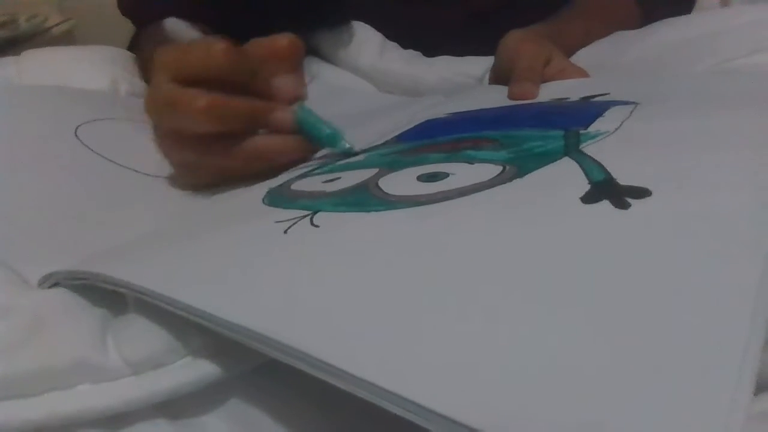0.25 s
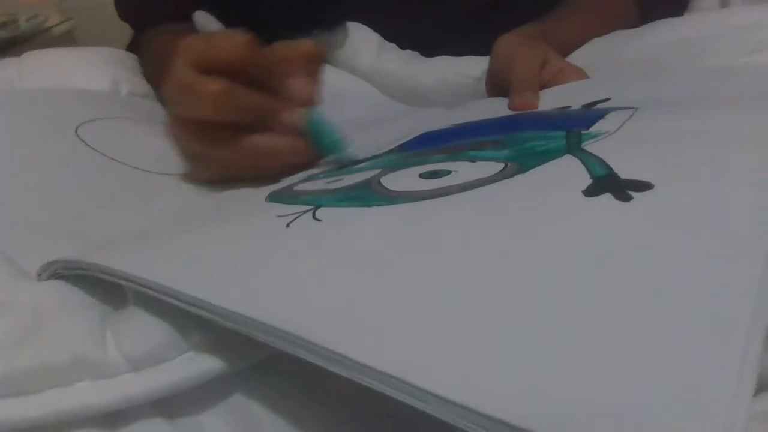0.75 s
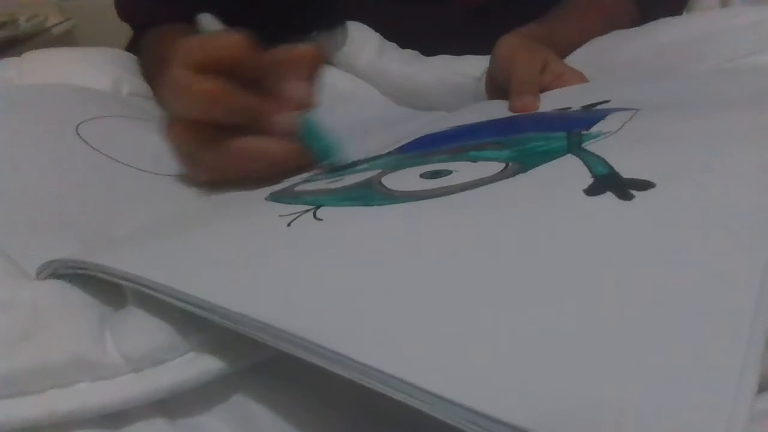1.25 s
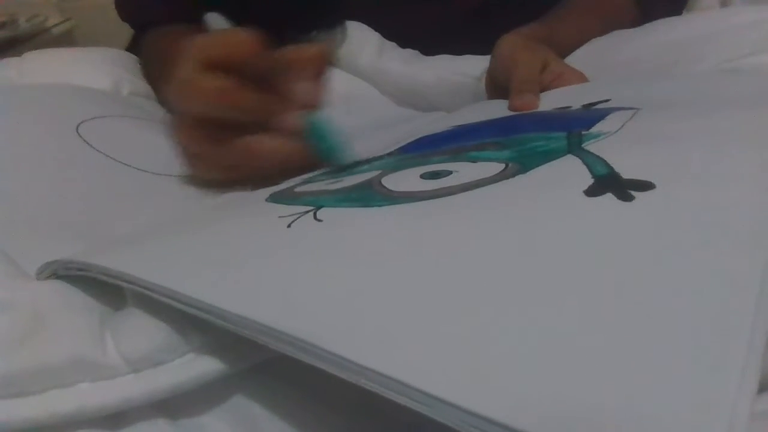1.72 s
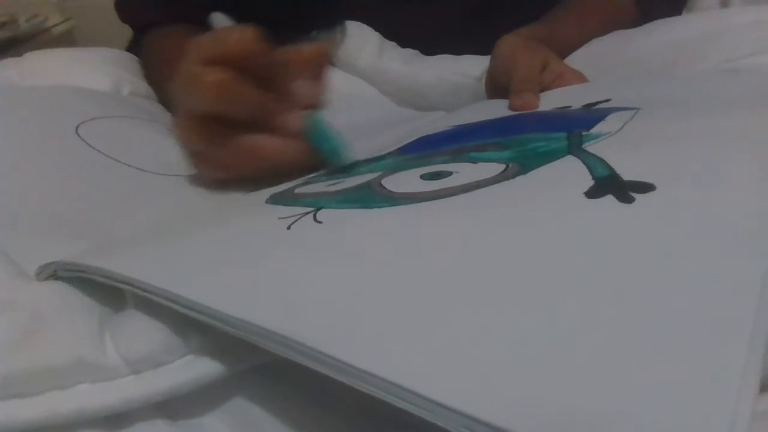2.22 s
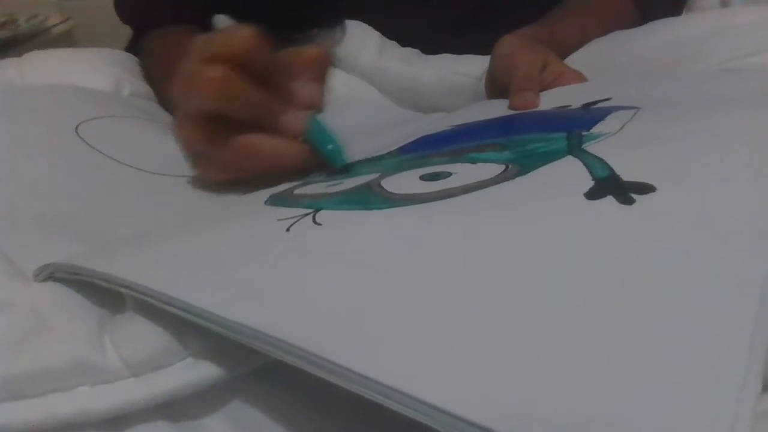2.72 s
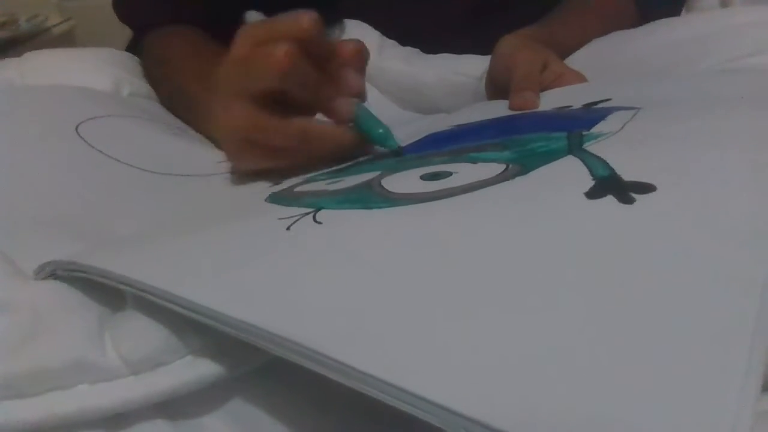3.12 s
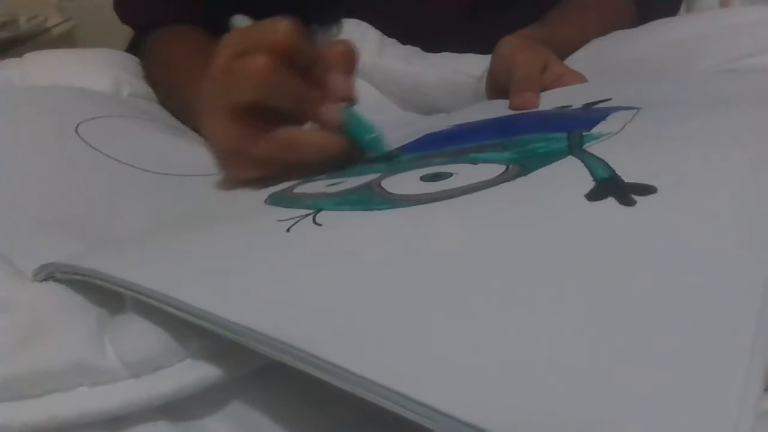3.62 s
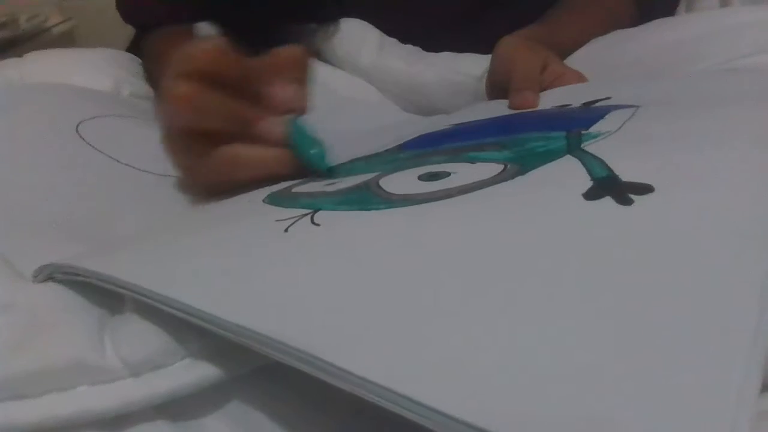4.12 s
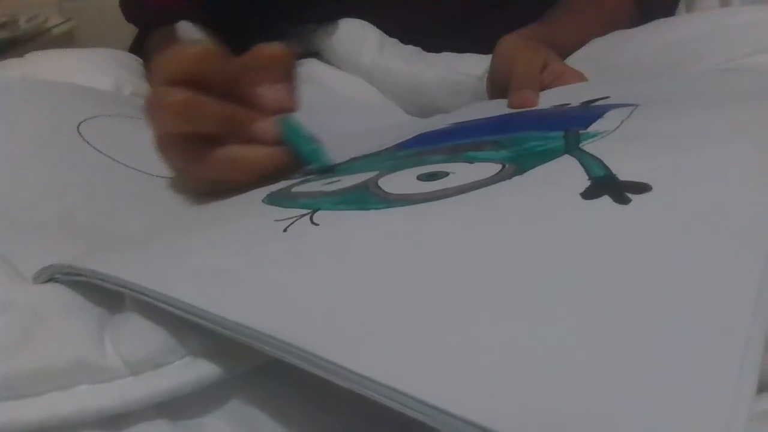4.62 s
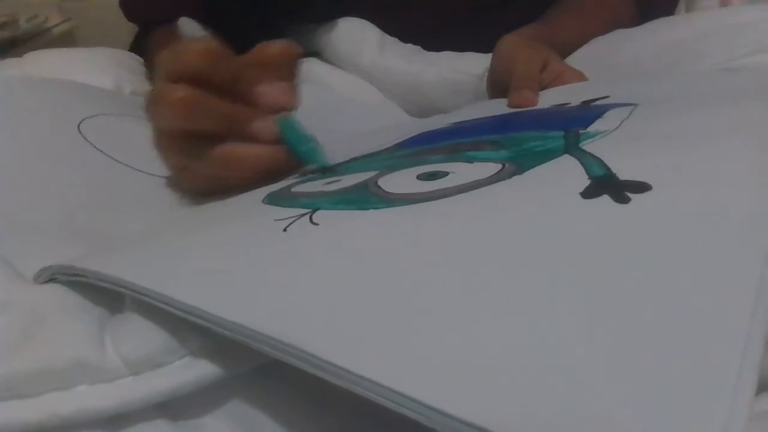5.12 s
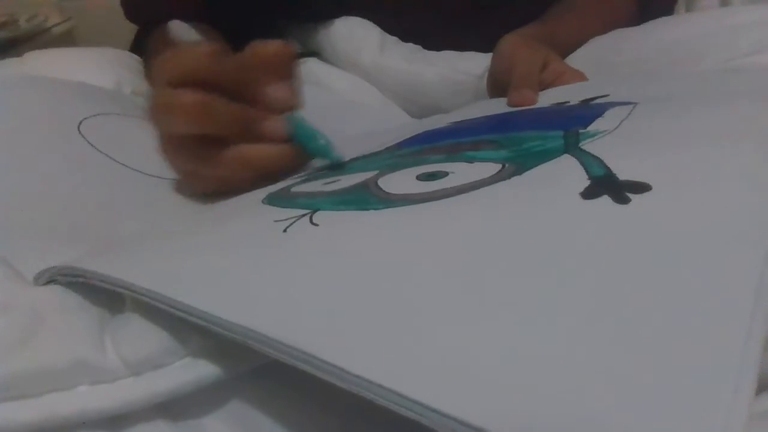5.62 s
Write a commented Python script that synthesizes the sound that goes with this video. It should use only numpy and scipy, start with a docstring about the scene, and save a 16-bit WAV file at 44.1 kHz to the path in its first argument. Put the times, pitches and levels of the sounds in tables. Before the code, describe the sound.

Fast, even marker strokes hiss and squeak softly on paper in a quiet room, with brief knocks first and a hand slide last.

```python
"""A soft hissing, squeaky rub goes back and forth: a felt-tip marker colours a sketchbook page in a quiet room.
Random snaps of felt fibre on paper grain ring the nib and the sheet; the barrel ticks where a stroke turns.
Early on the book knocks a few times, from short decaying rings; at the end the hand slides off the page.
Beneath lie page rustle, rumble from the leaning hand, soft pitched swells and room tone made of shaped noise."""
import sys
import numpy as np
from scipy import signal
from scipy.io import wavfile
from scipy.ndimage import uniform_filter1d

SR = 44100
rng = np.random.default_rng(int(sys.argv[2]) if len(sys.argv) > 2 else 0)


def int16_out(signal):
    """Quantize to a 16-bit WAV file."""
    q = np.round(np.clip(np.atleast_2d(signal).T, -1, 1) * 32767)
    wavfile.write(sys.argv[1], SR, q.astype(np.int16))


N = 258117  # length of the sound in samples

# Colour of the room tone. Each row: pitch in Hz, relative level in dB.
AIR_COLOUR = [(60, -15.5), (120, -3), (250, -4), (500, -6), (800, -14), (1400, -15), (1850, -21),
              (2500, -25), (4200, -15), (6000, -9.5), (9000, -17), (12000, -14.5), (16000, -27)]
AIR_DB = -60.5
HUM_HZ, HUM_DB, HUM_WAVER_DB = 831, -79.5, 1.5

# How fast the room echo fades. Each row: pitch in Hz, time to fall 60 dB in seconds.
ROOM_FADE = [(300, 0.27), (1500, 0.29), (5000, 0.2), (9000, 0.33), (15000, 0.4)]
ROOM_DB = -10

# The hand slides off the page. Each row: time in seconds, level in dB.
SLIDE_LEVEL = [(5.74, -93), (5.765, -47), (5.79, -53), (5.8, -42.5), (5.82, -44.5), (5.83, -47.5),
               (5.86, -42)]
# Rings of the sliding skin. Each row: pitch in Hz, width in Hz, relative level in dB.
PALM_RINGS = [(1090, 72, 4), (1440, 300, 3), (2200, 420, 3.5), (4520, 750, 1.5), (5340, 360, -4)]
# Pages shifting. Each row: time in seconds, level in dB.
RUSTLE_LEVEL = [(0.0, -53.5), (0.314, -49.5), (0.738, -57), (0.9, -64)]
# Rings of the pages. Each row: pitch in Hz, width in Hz, relative level in dB.
PAGE_RINGS = [(350, 410, 0.5), (563, 210, -2), (930, 390, -3.5), (1360, 490, 0)]
# The hand leans on the book. Each row: time in seconds, level of the low ring in dB,
# level of the mid ring in dB (the upper ring follows it, UPPER_DB away).
RUMBLE_LEVEL = [(0, -75, -64), (.44, -62, -60.5), (.9, -68.5, -67), (1.5, -72, -68), (2.5, -68, -64.5),
                (3.0, -71, -66.5), (3.6, -63.5, -64.5), (4.6, -67.5, -69), (5.3, -64.5, -73),
                (5.85, -62, -68)]
# Low, mid and upper ring of the leaned-on book, one list for each.
# Each row in a list: pitch in Hz, width in Hz, relative level in dB.
LEAN_RINGS = [
    [(102, 37, 0)],
    [(154, 88, 1.5), (205.6, 72, 4)],
    [(330.6, 28, 3.5), (498.4, 104, 2)],
]
UPPER_DB, LUMPS_DB, LUMPS_S = -5, 2.5, .08  # each ring comes in slow lumps

# Brief soft pitched swells. Each row: start in seconds, length in seconds, pitch in Hz, width in Hz, level in dB.
SWELLS = [(0.387, 0.066, 2700, 180, -43.5), (0.649, 0.038, 2700, 200, -50), (1.91, 0.082, 495, 54, -59),
          (2.39, 0.088, 157, 45, -55), (2.871, 0.055, 231, 23.15, -59), (2.99, 0.053, 205, 27.78, -56)]

# The book knocks. Each row: time in seconds, level in dB, pitch the blow favours in Hz,
# board thump in dB against that level.
KNOCKS = [(0.0574, -15.5, 1440, -35), (0.0594, -16.5, 980, -7.5), (.0680, -31, 1400, -17),
          (0.0736, -29, 1300, -19), (0.2291, -25, 1520, -5), (0.2342, -25.5, 1090, 1.5),
          (0.3172, -24.5, 900, -3.5), (0.3198, -13.5, 1480, -19), (0.321, -20, 2260, -1),
          (0.329, -34, 1100, -13), (0.438, -26.5, 2200, -4.5), (0.4407, -21, 3200, -8.5),
          (.4420, -23.5, 3340, -1)]
# Rings of the pages under a blow. Each row: pitch in Hz, relative level in dB, time to fall 60 dB in seconds.
BOOK_RINGS = [(770, 3.5, 0.01), (1100, -1.5, 0.012), (1356, 2, 0.011), (1563, 2, 0.0085),
              (2070, -6, 0.0072), (2610, 3.5, 0.0074), (3860, 6.5, 0.0056), (4740, 7, 0.0067)]
BOARD_HZ, BOARD_T60_S = 528, 0.02  # thump of the board

# Barrel ticks where the nib grips or stops. Each row: time in seconds, level in dB, pitch in Hz.
TICKS = [(0.5907, -45.5, 1570), (0.7198, -49, 1370), (0.7921, -44, 1310), (0.9104, -48, 1300),
         (0.959, -44.5, 1490), (1.0364, -47.5, 1360), (1.2804, -47, 1420), (1.4377, -49.5, 1450),
         (1.6338, -48, 1316), (1.678, -45.5, 1450), (1.989, -46.5, 1390), (2.116, -47.5, 1310),
         (2.607, -43.5, 1320), (2.6515, -48, 1480), (2.8907, -43.5, 1440), (2.9623, -45, 1360),
         (3.4387, -48.5, 1510), (4.7497, -50, 1430)]
# Fainter ticks as every stroke sets off and stops. Each holds: level in dB against the rub, middle pitch in Hz.
GRIP_TICK = (-17.5, 1462)
STOP_TICK = (-17, 1343)
TICK_SPREAD_DB = 2.5

# Strokes, out and back in turn. Each row: start in seconds, length in seconds,
# rub level in dB as it sets off, rub level in dB as it arrives.
STROKES = [(0, 0.081, -39, -35), (.11, 0.089, -35.5, -42.5), (.243, 0.081, -39, -34),
           (.353, 0.097, -34.5, -41.5), (0.476, 0.089, -37.5, -36), (0.587, 0.085, -36, -39),
           (0.718, 0.08, -40, -34), (0.839, 0.082, -35, -39.5), (0.959, 0.083, -39, -33.5),
           (1.071, 0.087, -34.5, -38), (1.204, .079, -36, -32), (1.31, 0.09, -38, -40.5),
           (1.437, 0.077, -39.5, -35), (1.547, 0.093, -39.5, -39.5), (1.675, 0.083, -39.5, -37.5),
           (1.782, 0.093, -37.5, -38.5), (1.914, 0.084, -37, -37.5), (2.029, 0.091, -38.5, -41),
           (2.156, 0.082, -38, -36.5), (2.278, 0.086, -37, -37), (2.401, .077, -36, -36),
           (2.522, 0.092, -36, -40), (2.649, 0.076, -36, -33), (2.762, .085, -33.5, -37.5),
           (2.888, 0.078, -37.5, -31.5), (3.006, 0.087, -35.5, -38.5), (3.127, 0.081, -42, -36),
           (3.245, 0.089, -37, -41.5), (3.366, .077, -42.5, -38), (3.478, 0.094, -39, -44.5),
           (3.612, 0.076, -39.5, -41.5), (3.721, 0.078, -37, -40.5), (3.842, 0.063, -41, -43.5),
           (3.937, 0.084, -37.5, -43.5), (4.049, 0.082, -40.5, -44.5), (4.146, 0.1, -44, -44.5),
           (4.269, 0.081, -44, -44), (4.371, .093, -45, -41.5), (4.502, 0.075, -40.5, -45),
           (4.599, 0.072, -42.5, -42.5), (4.707, 0.06, -41.5, -43), (4.786, 0.073, -45.5, -44.5),
           (4.89, 0.08, -44.5, -42), (4.995, 0.084, -42.5, -42.5), (5.11, 0.077, -44, -42.5),
           (5.21, 0.074, -48, -39.5), (5.323, 0.07, -41.5, -42.5), (5.412, 0.076, -45.5, -40.5),
           (5.519, 0.064, -41.5, -45), (5.597, 0.072, -42, -47), (5.688, 0.068, -41.5, -43.5)]
# The grip drifts. Each row: time in seconds, hiss centre in Hz, nib squeak in Hz, crispness 0-1,
# mid-stroke easing 0-1, then levels in dB against the hiss of the breathy skirt under the squeak,
# the shoulder, the low sheet ring and the high sheet ring. Speed and direction shift these further.
GRIP = [(0, 9200, 6200, 0.76, 0.97, -5.5, -3.5, -5, -9.5),
        (.4, 8980, 6220, 0.77, 0.6, -4.5, -3, -12.5, -11.5),
        (.9, 8750, 6270, 0.91, 0.88, -5.5, -6.5, -15, -15),
        (1.6, 8940, 6220, .95, 0.65, -7, -1.5, -16, -13),
        (2.2, 9010, 6230, 0.8, .9, -4.5, -4.5, -14.5, -13.5),
        (2.9, 9200, 6210, 0.6, 1, -5, -12, -18.5, -13), (3.3, 9260, 6180, 0.37, 0.16, -6, -9.5, -15, -13),
        (3.75, 9180, 6070, 0, 0, -6, -12, -14, -11), (4.2, 9150, 6120, 0.43, 0.43, -5, -4, -12, -12.5),
        (4.8, 8850, 6120, 0.42, .2, -3.5, -1, -10.5, -17.5),
        (5.3, 8850, 6250, 0.56, .2, -2.5, 0.5, -10.5, -16), (5.8, 8800, 6240, 0.7, 0, -5, -3, -7.5, -21)]

# Rings that slide with the hiss centre. Each row: Hz from the centre, width in Hz, relative level in dB.
HISS = [(-400, 920, -3), (-15, 1700, 0), (595, 820, -6)]
EDGE = [(1660, 1460, 0)]
TOP = [(3200, 1400, -2), (4400, 900, -11)]
# Rings that slide with the squeak pitch. Each row: Hz from that pitch, width in Hz, relative level in dB.
SQUEAK = [(66, 530, 0.5)]
SKIRT = [(-850, 900, 0.33), (-350, 450, -0.23)]
# Rings that stay put. Each row: pitch in Hz, width in Hz, relative level in dB.
SHOULDER = [(7200, 450, 0), (7750, 500, -1)]
FIZZ_LOW = [(14170, 750, 0)]
FIZZ = [(15100, 1000, -1), (14800, 430, -5.5)]
SHEET_LOW = [(2324, 330, -3.5), (2740, 760, 0.9)]
SHEET_HIGH = [(3680, 1130, 3.5), (4610, 280, -5.5)]
BARREL = [(1164, 280, -3.5), (1463, 276, 0)]

EDGE_DB = -9.5  # against the hiss
BARREL_DB = -9.5  # against the low sheet ring
# Levels against the hiss. Each holds: dB at crispness 0, dB at crispness 1.
SQUEAK_DB = [-7, 0.1]
TOP_DB = [-20, -10.5]
FIZZ_LOW_DB = [-18, -13.5]
FIZZ_DB = [-16, -7]

# Nib speed along a stroke. Each row: share of the stroke's length, speed 0-1.
SPEED = [(0, 0.01), (.3, 0.72), (.7, 0.8), (1, 0.19)]
MID_SPEED = .6  # at this speed the layers keep their plain levels
# Change in dB from speed 0 to speed 1, in the order hiss, edge, top, squeak, skirt, shoulder, low fizz, fizz,
# low sheet, high sheet, barrel: fast is bright.
SPEED_DB = [7, 7, 11, 3, 2, 5.5, 18, 15, -1.5, -1.1, -1.5]
SPEED_HZ = 300  # climb of the hiss from speed 0 to speed 1
# Change in dB on the back stroke, layers in the same order.
BACK_DB = [0.2, -0.3, -1.1, 0.3, -1.54, -3.5, -1.5, -1, -0.17, 1.05, -2]
# Change on the back stroke: hiss centre in Hz, squeak in Hz.
BACK_HZ = [-57, -50]
# Dip in mid-stroke at full easing: out stroke in dB, back stroke in dB.
SAG_DB = [5.5, 2.4]
RISE_S = 0.0027  # the felt breaks loose

MIC_LOW_HZ, TREBLE_LIMIT_HZ = 88, 15780


def amp(db):
    """Turns decibels into a gain."""
    return 10 ** (np.asarray(db) / 20)


def evened(x):
    """Scales a sound to an average strength (RMS) of 1."""
    return x / np.sqrt(np.mean(x ** 2) + 1e-20)


def read(points, hz):
    """Reads a curve of (Hz, value) rows, with pitch on a log scale."""
    f, value = np.transpose(points)
    return np.interp(np.log(hz + 1), np.log(f + 1), value)


def played(rows, column=1):
    """Gain along a curve of timed dB levels, silent outside it."""
    rows = np.array(rows)
    return amp(np.interp(np.arange(N) / SR, rows[:, 0], rows[:, column], left=-200, right=-200))


def add(mix, s, sound):
    """Lays a sound into the mix, starting at s seconds."""
    part = mix[round(s * SR):][:len(sound)]
    part += sound[:len(part)]


def resonate(x, hz, width_hz):
    """Rings at hz: shifts hz down to zero, smooths twice for steep skirts, and shifts back."""
    turn = np.exp(2j * np.pi * np.cumsum(hz * np.ones(len(x))) / SR)
    r = np.exp(-np.pi * width_hz / SR)
    smooth = signal.lfilter([(1 - r) ** 2], [1, -2 * r, r * r], x / turn)
    return 2 * (turn * smooth).real


def body_of(drive, modes, centre_hz=0):
    """Each ring is driven by its own patch of contact; drive() gives the force on one patch."""
    share = np.array([amp(db) for hz, width, db in modes])
    total = 0
    for gain, (hz, width, db) in zip(share, modes):
        ring = resonate(drive(), centre_hz + hz, width)
        total = total + gain * ring / np.sqrt(np.pi * width / SR)
    return total / np.linalg.norm(share)


def catches(count, per_s, spread_db):
    """Dense random snaps of uneven size, as when a surface catches and lets go."""
    size = amp(spread_db * np.minimum(rng.exponential(1, count), 4))
    snaps = rng.standard_normal(count) * (rng.random(count) < per_s / SR)
    return evened(size * snaps)


def wander(span_s):
    """Slow random drift, smooth over about span_s seconds."""
    span = round(span_s * SR)
    return evened(uniform_filter1d(uniform_filter1d(rng.standard_normal(N), span), span))


def air():
    """Room tone is noise that is patchy in time and pitch, with a faint wavering hum."""
    frames, hz = N // 256 + 5, np.fft.rfftfreq(1024, 1 / SR)
    a, b, patches = rng.standard_normal((frames, 513, 3)).T
    patches = evened(uniform_filter1d(uniform_filter1d(patches, 6, 0), 10, 1))
    spectrum = (a + 1j * b) * amp(read(AIR_COLOUR, hz)[:, None] + 3.6 * patches)
    tone = signal.istft(spectrum, nperseg=1024, noverlap=768)[1][:N]
    hum = amp(HUM_WAVER_DB * wander(.2)) * np.sin(2 * np.pi * HUM_HZ * np.arange(N) / SR)
    return amp(AIR_DB) * evened(tone) + amp(HUM_DB) * evened(hum)


def room(x):
    """Echoes are sparse copies of random sign, each pitch band dying at its own speed."""
    taps = np.zeros(SR // 2)
    at = np.arange(200, len(taps) - 20, 20)
    taps[at + rng.integers(0, 20, len(at))] = rng.choice([-1., 1.], len(at))
    hz, t, bands = signal.stft(taps, SR, nperseg=256)
    fade = amp(-60 * t / read(ROOM_FADE, hz)[:, None])
    tail = signal.istft(bands * fade, SR, nperseg=256)[1]
    return signal.fftconvolve(x, tail / np.linalg.norm(tail))[:N]


def swells():
    """A narrow ring of filtered noise rises and fades."""
    out = np.zeros(N)
    for s, length, hz, width_hz, db in SWELLS:
        # keep only the end, once the ring has built up
        ring = resonate(rng.standard_normal(SR // 2), hz, width_hz)[-round(length * SR):]
        add(out, s, amp(db) * evened(ring) * np.hanning(len(ring)))
    return out


def hand():
    """Skin drags off the page, pages rustle, and the leaning hand rumbles through the book."""
    slide = body_of(lambda: catches(N, 3000, 3.0), PALM_RINGS) * played(SLIDE_LEVEL)
    rustle = body_of(lambda: catches(N, 1500, 5.1), PAGE_RINGS) * played(RUSTLE_LEVEL)
    low, mid, upper = (body_of(lambda: rng.standard_normal(N), modes) * amp(LUMPS_DB * wander(LUMPS_S))
                       for modes in LEAN_RINGS)
    rumble = low * played(RUMBLE_LEVEL) + (mid + amp(UPPER_DB) * upper) * played(RUMBLE_LEVEL, column=2)
    return slide + rustle + rumble


def knocks():
    """Short rough blows ring the pages and thump the board of the book."""
    out, t = np.zeros(N), np.arange(2000) / SR
    chance = rng.random((len(KNOCKS), 2, len(BOOK_RINGS)))
    for (s, db, blow_hz, board_db), (detune, phase) in zip(KNOCKS, chance):
        ring = np.zeros(len(t))
        for (hz, ring_db, t60), u, p in zip(BOOK_RINGS, detune, phase):
            favour_db = -6.1 * np.log2(hz / blow_hz) ** 2  # weaker away from the blow's pitch
            ring_hz = hz * (1 + 0.13 * (u - .5))
            ring += amp(ring_db + favour_db - 60 * t / t60) * np.sin(2 * np.pi * (ring_hz * t + 0.5 * p))
        ring *= 1 - np.exp(-t / 0.00043)
        thump = amp(board_db - 60 * t / BOARD_T60_S) * np.sin(2 * np.pi * BOARD_HZ * t)
        thump *= 1 - np.exp(-t / 0.00061)
        add(out, s, amp(db) * (0.6 * ring + thump))
    return out


def ticks():
    """The plastic barrel rings a few cycles when the nib grips or stops."""
    out, t = np.zeros(N), np.arange(600) / SR
    shape = amp(-60 * t / 0.014) * (1 - np.exp(-t / 0.0019))
    plain = []
    for s, length, off_db, arrive_db in STROKES:
        plain.append((s, off_db + GRIP_TICK[0], GRIP_TICK[1]))
        plain.append((s + length - .005, arrive_db + STOP_TICK[0], STOP_TICK[1]))
    chance = rng.standard_normal((len(plain), 2))
    faint = [(s, db + TICK_SPREAD_DB * a, hz * (1 + 0.043 * b)) for (s, db, hz), (a, b) in zip(plain, chance)]
    for s, db, hz in list(TICKS) + faint:
        add(out, s, amp(db) * shape / shape.max() * np.sin(2 * np.pi * hz * t))
    return out


def marker():
    """Fibre snaps under each stroke drive the nib, barrel and sheet resonances."""
    rows, t = np.array(STROKES), np.arange(N) / SR
    now = np.maximum(np.searchsorted(rows[:, 0], t, "right") - 1, 0)  # the stroke under way
    start, length, off_db, arrive_db = rows[now].T
    back = now % 2  # 0 on the way out, 1 on the way back
    since = t - start
    along = np.clip(since / length, 0, 1)

    # the grip is read once a stroke, at its start
    grip = np.array(GRIP)
    hiss_hz, squeak_hz, crisp, easing, skirt_db, shoulder_db, low_db, high_db = (
        np.interp(start, grip[:, 0], column) for column in grip[:, 1:].T)
    speed = np.interp(along, *np.transpose(SPEED)) - MID_SPEED
    hiss_hz = hiss_hz + BACK_HZ[0] * back + SPEED_HZ * speed
    squeak_hz = squeak_hz + BACK_HZ[1] * back
    squeak_db, top_db, fizz_low_db, fizz_db = (
        dull + (clear - dull) * crisp for dull, clear in (SQUEAK_DB, TOP_DB, FIZZ_LOW_DB, FIZZ_DB))

    ease_db = np.array(SAG_DB)[back] * easing * np.sin(np.pi * along) ** 2
    rub = amp(off_db + (arrive_db - off_db) * along - ease_db + 0.42 * wander(0.0029))
    rising = since / RISE_S
    slowing = np.maximum(since - length + 0.0078, 0)
    # the felt breaks loose, then drags to rest; the sheet feels the jerk sooner
    nib = rub * np.clip(rising, 0, 1) * np.exp(-slowing / 0.0072)
    sheet = rub * np.clip(4.3 * rising, 0, 1) * np.exp(-slowing / 0.0056)
    # each turn shakes the barrel
    jolt_db = 7.3 * (np.exp(-since / 0.002) + np.exp(-((since - length + .005) / 0.008) ** 2))

    # each layer: force, rings, centre in Hz, level in dB
    layers = ((nib, HISS, hiss_hz, 0),
              (nib, EDGE, hiss_hz, EDGE_DB),
              (nib, TOP, hiss_hz, top_db),
              (nib, SQUEAK, squeak_hz, squeak_db),
              (nib, SKIRT, squeak_hz, skirt_db),
              (nib, SHOULDER, 0, shoulder_db),
              (nib, FIZZ_LOW, 0, fizz_low_db),
              (nib, FIZZ, 0, fizz_db),
              (sheet, SHEET_LOW, 0, low_db),
              (sheet, SHEET_HIGH, 0, high_db),
              (sheet, BARREL, 0, low_db + BARREL_DB + jolt_db))
    out = np.zeros(N)
    for (push, modes, hz, db), fast_db, back_db in zip(layers, SPEED_DB, BACK_DB):
        force = push * amp(db + fast_db * speed + back_db * back)
        # the grain favours one ring, then another
        out += body_of(lambda: force * amp(2.73 * wander(0.02)) * catches(N, 18000, 1.5), modes, hz)
    return out


def scene():
    """Only the marker, its ticks and the knocks are echoed by the room."""
    near = marker() + ticks() + knocks()
    background = hand() + swells() + air()
    return (near + amp(ROOM_DB) * room(near) + background)[None]


def record(dry):
    """The small microphone drops the deep bass; then the highest treble is cut off."""
    thin = signal.sosfilt(signal.butter(3, MIC_LOW_HZ, "high", fs=SR, output="sos"), dry)
    treble_cut = signal.firwin(1535, TREBLE_LIMIT_HZ, window=("kaiser", 9), fs=SR)
    return signal.oaconvolve(thin, treble_cut[None], "same")


dry = scene()
out = record(dry)
int16_out(out)
```